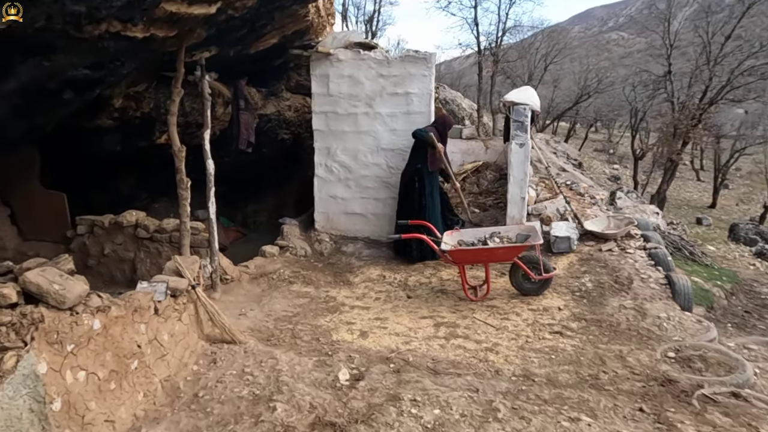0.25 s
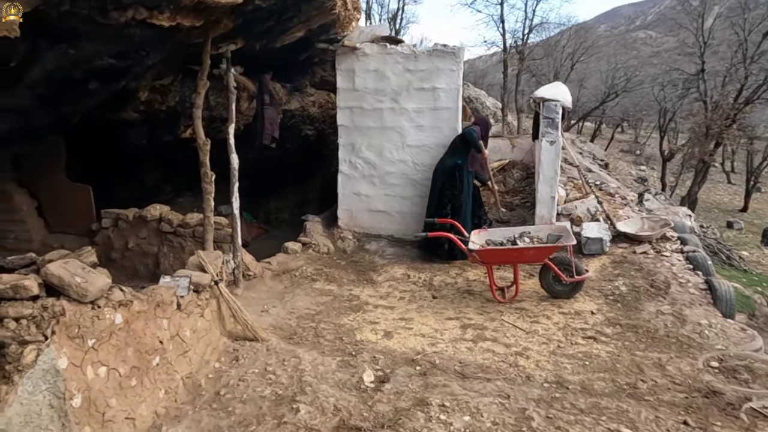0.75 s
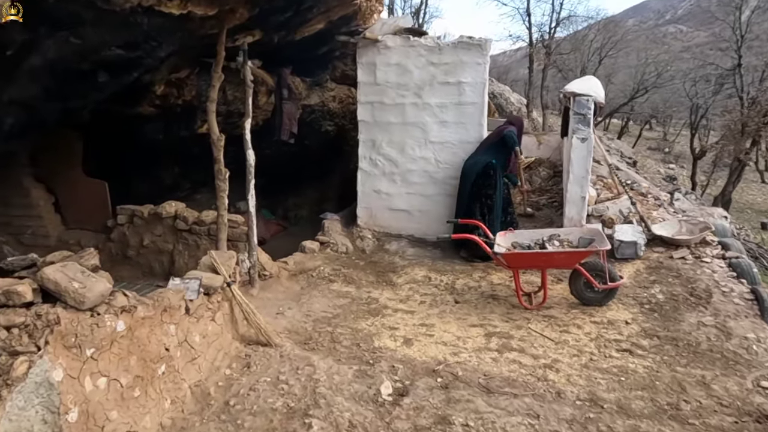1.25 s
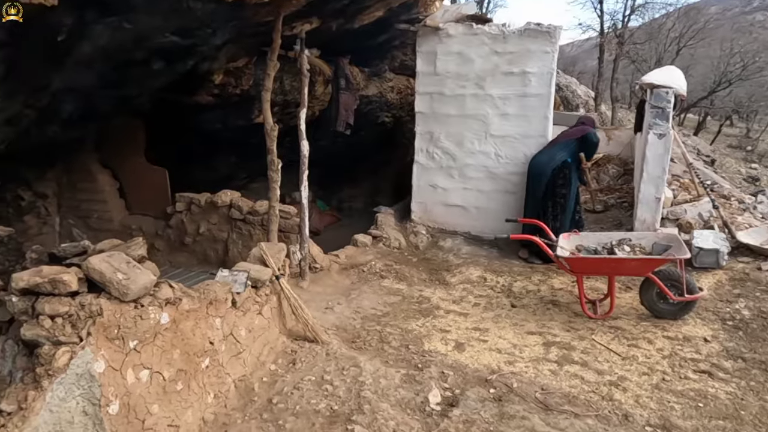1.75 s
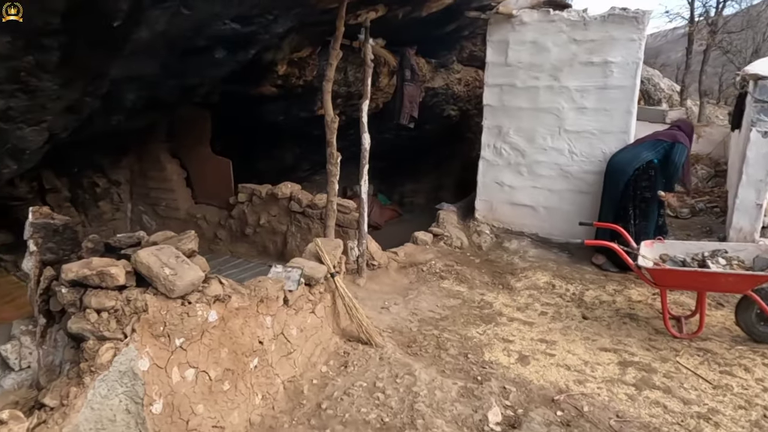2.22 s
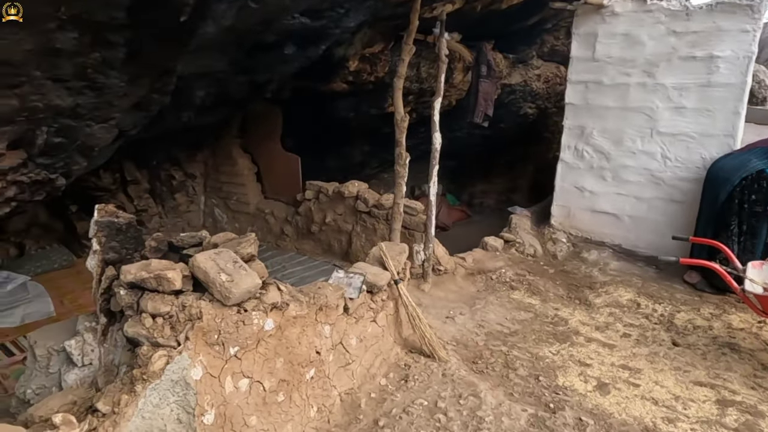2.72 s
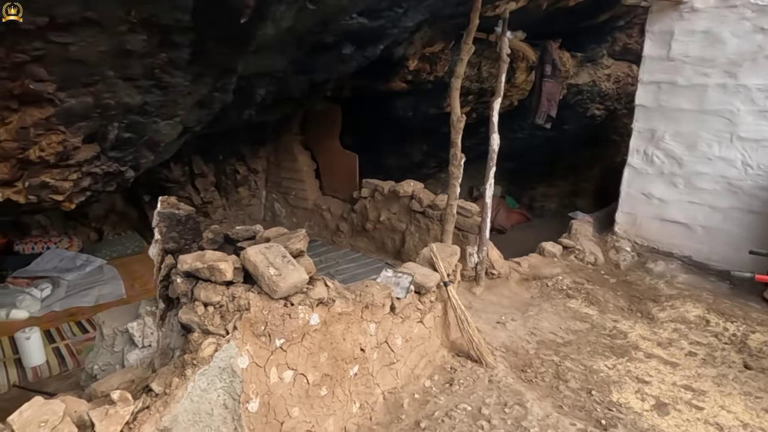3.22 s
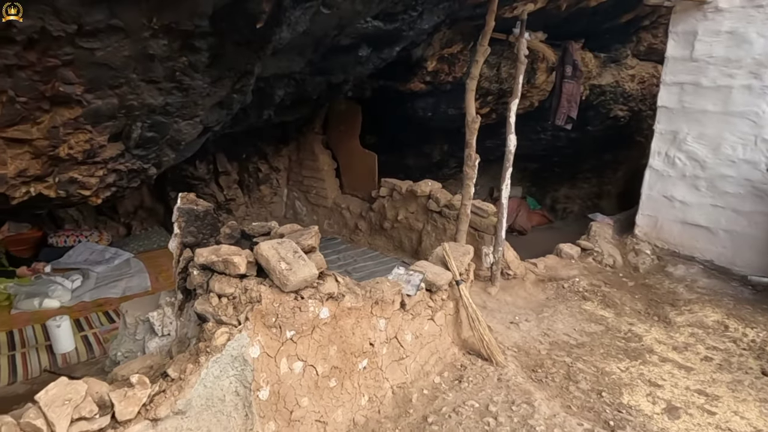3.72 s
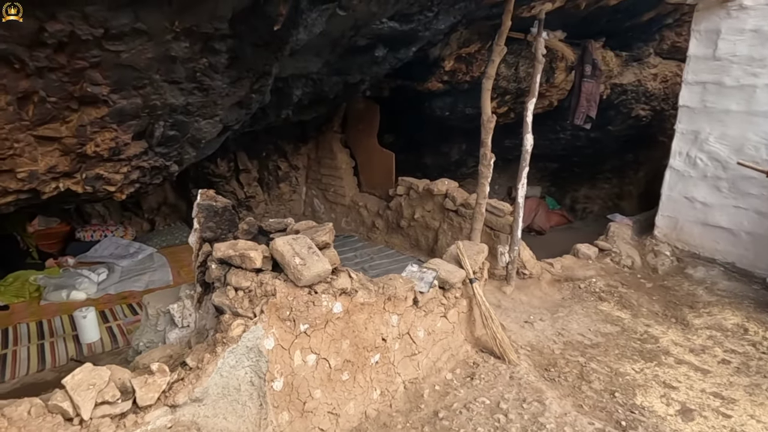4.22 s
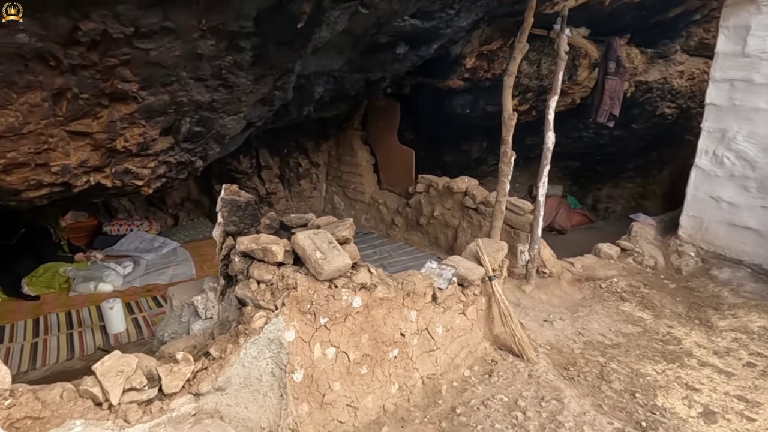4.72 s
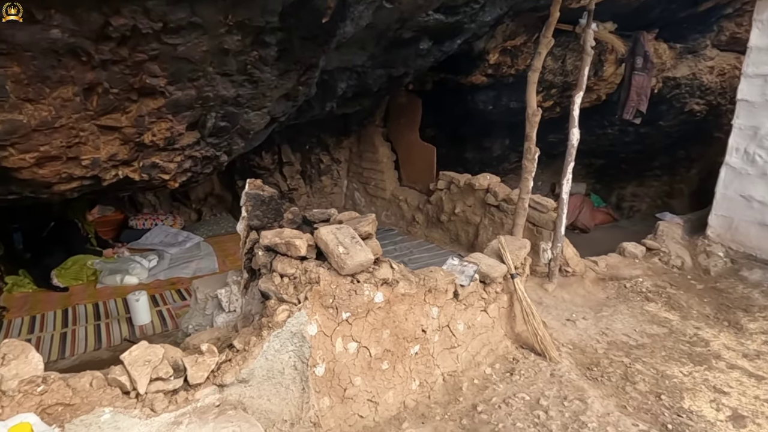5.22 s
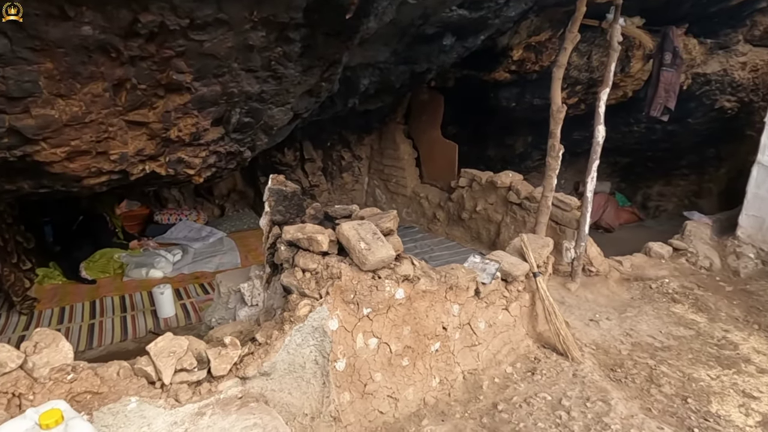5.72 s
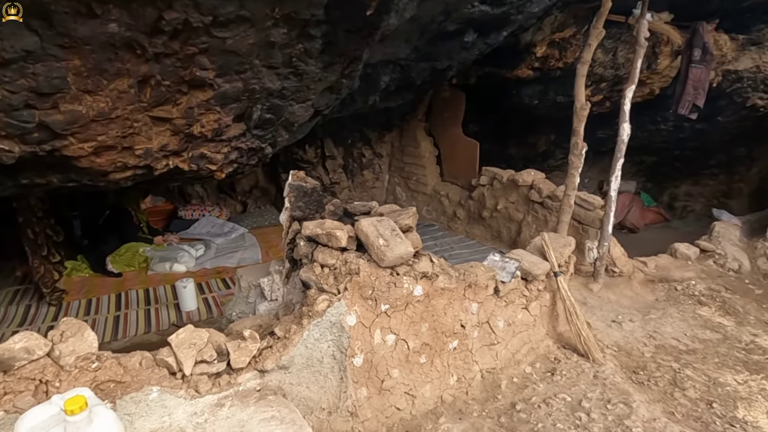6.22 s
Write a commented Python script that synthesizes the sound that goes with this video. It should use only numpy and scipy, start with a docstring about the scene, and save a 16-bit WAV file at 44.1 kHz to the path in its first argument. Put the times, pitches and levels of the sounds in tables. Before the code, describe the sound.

A shovel scrapes gritty dirt and knocks stones in bursts, then rubble thuds and clangs into a steel wheelbarrow outdoors, with low breeze and camera bumps.

```python
"""Beside a rock shelter, a long-handled shovel scrapes up dirt and stones and tips a load into a steel wheelbarrow.
Grit grinding is random tiny collisions, shaped in tone and following the force of each push.
Stones, clods and the tray are short bursts of collisions that ring or thud; a wall and the rock echo them.
Noise makes the breeze and hiss, single pressure pushes bump the camera, and gliding tones make a small far bird."""
import sys
import numpy as np
from scipy import signal
from scipy.fft import rfft, irfft
from scipy.io import wavfile
from scipy.ndimage import uniform_filter1d, map_coordinates

SR = 44100
rng = np.random.default_rng(int(sys.argv[2]) if len(sys.argv) > 2 else 0)


def dump(signal):
    """Clip the signal to [-1, 1] and save it as 16-bit WAV at the path in sys.argv[1]."""
    limited = np.clip(np.atleast_2d(signal).T, -1, 1)
    pcm = np.round(limited * 32767).astype(np.int16)
    wavfile.write(sys.argv[1], SR, pcm)


N = 284886
TIME = np.arange(N) / SR

# In all tables, levels are relative: the functions set the balance between layers.
# tone of grit on steel: pitch_hz [Hz], level_db [dB]
GRIT_TONE = [(100, -21.5), (200, -3), (420, -12.5), (640, -6), (900, -4), (1200, -0.5), (1600, -0.5),
             (2200, -9.5), (3100, -6.5), (4300, -8), (5500, -11.5), (7000, -12), (9000, -20),
             (12000, -29.5), (15500, -45)]
# rubble landing in the wheelbarrow: start_s [s], level_db [dB], settle_s [s], half_cutoff_hz [Hz, half the treble cutoff]
DUMPS = [(4.723, -41.5, 0.038, 896), (4.804, -30, 0.015, 800), (4.822, -26.5, 0.016, 780),
         (4.866, -34, 0.034, 1900), (4.9015, -21.5, 0.01, 3410), (4.912, -22, 0.015, 2802),
         (4.935, -27, 0.01, 1400), (4.948, -26.5, 0.012, 1400), (4.96, -31.5, 0.0084, 1500),
         (5.003, -41, 0.017, 1200)]
# bumps on the camera: start_s [s], level_db [dB], push_s [s]
BUMPS = [(0.458, -23.5, 0.0026), (0.477, -22, 0.054), (0.73, -28.5, 0.015), (1.225, -20.5, 0.038),
         (1.333, -17.5, 0.047), (1.48, -20.5, 0.057), (2.665, -25, 0.027), (3.345, -37.5, 0.00582),
         (3.521, -30.5, 0.014), (4.711, -11, 0.0072), (5.127, -20, 0.019), (5.425, -31.5, 0.01246),
         (6.23, -22, 0.011)]


def amp(db):
    """Turns decibels into a gain."""
    return 10 ** (np.asarray(db) / 20)


def evened(x):
    """Scales a sound to an average strength (rms) of 1."""
    return x / np.sqrt(np.mean(x ** 2) + 1e-20)


def read(points, hz):
    """Reads a table of values against pitch, on a log-frequency axis."""
    f, value = np.transpose(points)
    return np.interp(np.log(hz + 1), np.log(f + 1), value)


def add(mix, start_s, sound):
    """Mixes a sound in at a given time."""
    part = mix[max(round(start_s * SR), 0):][:len(sound)]
    part += sound[:len(part)]


def colour(x, db_at, size=4096):
    """Filters with the tone db_at(Hz), never sounding before its input; the filter has unit energy."""
    db = db_at(abs(np.fft.fftfreq(size, 1 / SR)))
    log_gain = np.log(amp(np.maximum(db - db.max(), -100)))
    # The Hilbert transform gives the phase that makes the filter respond as early as possible.
    taps = np.fft.ifft(np.exp(np.conj(signal.hilbert(log_gain)))).real[:size // 2]
    return signal.fftconvolve(x, taps / np.linalg.norm(taps))[:len(x)]


def noise(spectrum):
    """Makes steady noise with a given tone."""
    hz = np.fft.rfftfreq(N, 1 / SR)
    shaped = rfft(rng.standard_normal(N)) * amp(read(spectrum, hz))
    return evened(irfft(shaped, N))


def wander(size):
    """Makes a slow random drift by smoothing noise twice, first over size samples."""
    once = uniform_filter1d(rng.standard_normal(N), size=size)
    return evened(uniform_filter1d(once, size=size // 2))


def grains(count, per_s, spread_db):
    """Random tiny collisions: many small, a few large."""
    size = amp(spread_db * np.minimum(rng.exponential(1, count), 4))
    sign = rng.choice([-1, 1], count)
    happens = rng.random(count) < per_s / SR
    return evened(size * sign * happens)


def ring(x, modes):
    """Rings a set of fading pure tones (Hz, dB, seconds to fade 60 dB), with unit energy in all."""
    t = TIME[:SR // 2]
    tone = np.zeros(len(t))
    for k, (hz, db, t60_s) in enumerate(modes):
        tone += (-1) ** k * amp(db - 60 * t / t60_s) * np.sin(2 * np.pi * hz * t)
    return signal.fftconvolve(x, tone / np.linalg.norm(tone))[:len(x)]


def air():
    """Faint outdoor hiss, plus one broad hollow resonance that drifts with a soft low wash."""
    # tone of the hiss: pitch_hz [Hz], level_db [dB]
    hiss_tone = [(88, -23), (150, -2), (193, -7), (428, -13), (860, -20.5), (1090, -2.5), (1320, -4),
                 (1540, -11.5), (2360, -22.5), (4140, -29), (5230, -24.5), (7560, -27.5), (9730, -41),
                 (11600, -34), (15500, -63)]
    # the hollow resonance: start_s [s], level_db [dB], centre_hz [Hz]
    hollow_path = [(0, -54, 1264), (0.449, -53, 1326), (0.799, -52, 1439), (1.401, -52, 1443),
                   (2.1, -66.5, 1266), (3.001, -71, 1201), (3.6, -66, 1223), (4.298, -59, 1260),
                   (5.399, -66.5, 1283), (5.8, -62.5, 1319), (6.46, -61, 1310)]
    start_s, level_db, centre_hz = np.transpose(hollow_path)
    turn = np.exp(2j * np.pi * np.cumsum(np.interp(TIME, start_s, centre_hz)) / SR)
    raw = rng.standard_normal(N) + 1j * rng.standard_normal(N)
    band = signal.lfilter(*signal.butter(2, 150, fs=SR), raw)
    resonance = evened((band * turn).real)  # the turning carries the narrow band up to its drifting centre
    wash = noise([(90, -23), (190, 7.5), (380, -12.0), (700, -1.5), (1100, -4.5),
                  (1700, -1.5), (2600, -31.0), (8000, -57.0)])
    hollow = amp(np.interp(TIME, start_s, level_db)) * (resonance + amp(-6.0) * wash)
    hiss = noise(hiss_tone) + amp(-3) * np.array([noise(hiss_tone), noise(hiss_tone)])
    return amp(-0.5) * hollow + amp(-63) * hiss


def breeze():
    """Low wind buffeting, mostly shared by the two microphone ports; it flares up after each camera jolt."""
    # strength of the breeze: start_s [s], level_db [dB]
    gust_levels = [(0.0, -47.5), (0.7, -43), (0.9, -47), (1.3, -42), (1.6, -49.5), (2.1, -45.5),
                   (2.7, -47.5), (3.4, -47), (4.05, -50), (4.7, -42), (5.5, -57), (5.95, -49.5),
                   (6.24, -42.5), (6.46, -49)]
    # tone of the buffeting: pitch_hz [Hz], level_db [dB]
    rumble_tone = [(7.1, -24.5), (12, 4), (24, -6.5), (38, -14.5), (71, -16.5), (91, -29.5), (178, -31),
                   (254, -46), (400, -48.5), (520, -62), (880, -120)]
    gusts = amp(5.0 + np.interp(TIME, *np.transpose(gust_levels)))
    t = TIME[:SR // 3]
    fade_s, rise_s = 0.022, 0.0021
    shudder = np.exp(-t / fade_s) * (1 - np.exp(-t / rise_s))
    for start_s, level_db, push_s in BUMPS:
        quickness = 0.013 / push_s  # quicker jolts shake harder
        add(gusts, start_s, amp(level_db - 10.5) * quickness * shudder)
    own = np.array([noise(rumble_tone), noise(rumble_tone)])
    return gusts * (noise(rumble_tone) + amp(-8) * own)


def blade(x):
    """Rings the steel blade briefly, because soil damps it."""
    # ring of the blade: pitch_hz [Hz], width_hz [Hz, it fades 60 dB in 1.43 / width_hz seconds], level_db [dB]
    blade_modes = [(1130, 31, 9), (1555, 11, -3), (1993, 32, 8.5), (2512, 13, 0), (2785, 39, 0.5),
                   (2982, 24, 5), (3660, 20, 2.5), (4020, 37, -3.5), (4630, 16, -2), (5660, 74, -18),
                   (5950, 120, -15.5), (7300, 64, -2.5)]
    return ring(x, [(hz, db, 1.43 / width_hz) for hz, width_hz, db in blade_modes])


def detuned(x):
    """Soil sliding over the blade keeps bending its ring, by up to 2.5 percent in pitch."""
    knots = np.arange(0, N / SR + 1, .15)
    bend = np.interp(TIME, knots, rng.uniform(-.025, .025, len(knots)))
    return map_coordinates(x, [np.arange(N) + np.cumsum(bend)], order=3, mode="mirror")


def pebbles(per_s, cycles, spread_db, count=36):
    """Many small stones, each ringing at its own pitch, chatter in short clumps."""
    out, t = np.zeros(N), TIME[:SR // 30]
    for hz in np.geomspace(900, 9000, count) * rng.uniform(.95, 1.05, count):
        tick = evened(np.sin(2 * np.pi * hz * t) * np.exp(-t * hz / cycles))
        hits = grains(N, per_s, spread_db) * amp(3.5 * wander(1200))
        level = np.sqrt(hz) * amp(read(GRIT_TONE, hz))
        out += level * signal.oaconvolve(hits, tick)[:N]
    return evened(out)


def rasp(length_s, start_hz, end_hz, sharpness):
    """Quick slips of grit ring a resonance that glides in pitch."""
    hz = np.geomspace(start_hz, end_hz, int(length_s * SR))
    turn = np.exp(2j * np.pi * np.cumsum(hz) / SR)
    slips = grains(SR // 4, per_s=1200, spread_db=2)[:len(hz)]
    # Shift the glide down to zero pitch, keep a narrow band there, then shift it back up.
    narrow = signal.lfilter(*signal.butter(2, start_hz / max(sharpness, 2), fs=SR), slips / turn)
    return evened((turn * narrow).real) * signal.windows.tukey(len(hz), .7)


def scratches(count=260):
    """Pebbles catch under the blade and skid, each starting at its own pitch and falling a little."""
    out = np.zeros(N)
    for k, (when, pitch, span, force) in enumerate(rng.random((count, 4))):
        hz = 1100 * 4.5 ** pitch
        start_s = (k + when) / count * N / SR
        skid = rasp(.028 * (.5 + span), hz, hz * .88, sharpness=14)
        add(out, start_s, amp(6 * force) * skid)
    return evened(out)


def effort(start_s, rise_s, hold_s, fade_s):
    """Force of one movement: it builds, holds, then fades 20 dB per fade_s (negative fade_s makes it swell)."""
    age = TIME - start_s
    build = np.clip(age / max(rise_s, .001), 0, 1) ** 1.92
    return build * amp(-20 * np.maximum(age - rise_s - hold_s, 0) / fade_s)


def scrape():
    """Grit catches and slips along the blade and pebbles chatter on it; a heavier load adds low grinding."""
    # pushes of the shovel: start_s [s], rise_s [s], hold_s [s], fade_s [s per 20 dB],
    # level_db [dB], weight_db [dB of extra low grinding]
    strokes = [ (0.281, 0.043, 0.0085, 0.2, -45.5, -2), (0.463, 0.054, 0.02, 0.0525, -39, -3.5),
               (0.539, 0.059, 0.047, 0.06, -50.5, 2.5), (0.924, 0.12, 0.0197, 0.44, -48.5, -1),
               (1.074, 0.0388, 0.0048, 0.1341, -38, -6), (1.198, 0.053, 0.27, 0.1, -55, -5),
               (1.566, 0.1502, 0.054, 0.1262, -34, -11), (2.275, 0.11, 0.028, 0.122, -45.5, -3),
               (2.514, 0.1024, 0.093, 0.47, -55.5, -11), (2.664, 0.058, 0.044, 0.1118, -38.5, -2),
               (4.434, 0.11, 0.015, 0.4552, -43, -4), (4.554, 0.12, 0.4, 0.21, -43.5, -3.5),
               (5.942, 0.1, 0.02, 0.1, -39.5, -9), (6.042, 0.098, 0.35, 0.2, -41.5, -10),
               (6.168, 0.14, 0.14, -1.5, -38.5, -12)]
    # loose dirt trickling: start_s [s], length_s [s], level_db [dB]
    trickle_times = [(0.0, 0.013, -58.5), (0.13, 0.025, -54.5), (0.772, .24, -71), (1.896, 0.262, -60),
                     (2.246, 0.14, -66), (2.942, 0.21, -62), (5.15, 0.099, -58.5), (5.533, 0.059, -63)]
    drive = grains(N, per_s=4500, spread_db=3.6) * amp(2 * wander(300))
    grit = colour(drive, lambda hz: read(GRIT_TONE, hz))
    grit += amp(-11.5) * detuned(blade(drive))
    grit += amp(-2) * pebbles(per_s=45, cycles=6, spread_db=3)
    grit += amp(-5.5) * scratches()
    low = evened(signal.sosfilt(signal.butter(3, 1300, "low", fs=SR, output="sos"), grit))
    high = evened(signal.sosfilt(signal.butter(3, 1300, "high", fs=SR, output="sos"), grit))

    trickles = [(s, 0.0071, length_s, 0.12, db, 1) for s, length_s, db in trickle_times]
    # Grit follows each shower of rubble into the wheelbarrow.
    spills = [(s, 0.0066, 0, 0.035, db - 16, 7.5) for s, db, _, _ in DUMPS]
    force, load = np.zeros((2, N))
    for start_s, rise_s, hold_s, fade_s, level_db, weight_db in [*strokes, *trickles, *spills]:
        push = amp(level_db) * effort(start_s, rise_s, hold_s, fade_s)
        force = np.hypot(force, push)
        load = np.hypot(load, amp(weight_db) * push)
    return amp(-4) * force * high + amp(-3) * load * low


def stones():
    """Each stone gives a hard tick and a short crumble, rings at its own pitch, and rings the blade a little."""
    # stones knocking: start_s [s], level_db [dB at its loudest], pitch_hz [Hz], treble_db [dB],
    # crumble_s [s], tick_db [dB, first tick against the crumble]
    knocks = [ (0.141, -30.5, 3900, -4, 0.0041, 15), (0.152, -31, 6800, 1, 0.016, 9),
              (0.33, -39.5, 3700, 8, 0.012, -9), (0.5212, -32.5, 4700, 13, 0.0075, 8),
              (0.612, -38, 3700, 12, 0.029, 1), (.638, -39, 7800, 6.5, 0.0056, 4),
              (.812, -55, 5040, 10, 0.0045, 8.5), (1.017, -42, 6080, 11, 0.0059, -3),
              (1.047, -31, 2670, -13, 0.0093, -15), (1.1098, -32.5, 3200, -3, 0.0064, 1),
              (1.116, -33, 7100, -4, 0.0049, -4), (1.1247, -26, 2800, -26, 0.0061, 7),
              (1.166, -39, 4200, -3, .004, 8), (1.188, -31, 2400, -16, 0.0083, 4.5),
              (1.272, -40, 4040, -11, 0.013, 6), (1.319, -37, 3110, -5, 0.012, 5.5),
              (1.341, -43, 5100, -6, 0.0061, 5.5), (1.407, -42.5, 3700, -21, 0.0091, -4),
              (1.431, -40.5, 3200, -24, 0.0082, 4), (1.49, -47, 4600, -9, .004, 6),
              (1.519, -34, 2950, -3.5, 0.013, 6), (1.656, -32.5, 3140, -1.5, 0.0186, 3),
              (1.699, -29, 3220, -8, 0.0088, -1), (1.730, -19.5, 2140, -2, 0.0065, 7),
              (1.7351, -25, 2340, -9, 0.00705, -5), (1.776, -25, 3140, -1, 0.0054, 4.5),
              (1.843, -25, 1490, -12, 0.0046, 4), (1.8689, -32.5, 1460, -18, 0.0042, 14),
              (1.884, -29, 1362, -5, 0.0049, -1), (1.979, -30, 4700, 0, 0.011, 9.5),
              (2.088, -49, 7300, 8, 0.01, 7), (2.355, -42, 7000, 6, .012, 3),
              (2.419, -34, 1520, 3, 0.013, 8), (2.702, -33, 1140, 5, 0.019, 10),
              (2.737, -22.5, 1570, 4, 0.0077, 4), (2.745, -22, 1140, -5, .005, 10),
              (2.749, -24, 2500, -6, .004, 7), (2.757, -22, 1690, 0, .006, 6),
              (2.77, -19, 1510, 3, 0.005, 9), (2.774, -21.5, 5240, -7, 0.0053, 4),
              (2.78, -19, 4180, 4.5, 0.0061, 13), (2.788, -24.5, 3940, 4, 0.0067, 7),
              (2.809, -37, 1560, -6, 0.011, 2), (2.951, -54, 6000, 5, 0.0078, 3),
              (2.98, -51, 4440, 12, 0.0065, 5), (3.035, -53, 5000, 8, .005, 4),
              (3.109, -50, 2800, 1, 0.0084, 5), (3.127, -47.5, 2000, 4, 0.014, 6),
              (4.553, -33.5, 3600, -13, .02, -4.5), (4.562, -33, 1500, -9, .008, 4),
              (4.627, -37, 1700, -10, .006, 5), (4.687, -37.5, 2600, -7, 0.0056, 5),
              (4.788, -36, 3600, -4.5, 0.0045, 4.5), (4.864, -21, 3200, 7, 0.014, 4),
              (4.869, -23, 5300, 3, 0.011, -3), (4.901, -21.5, 2718, -12, .012, -4),
              (4.912, -19.5, 2900, -10, 0.0084, 6), (4.925, -25, 2050, -10, 0.012, 3.5),
              (4.959, -27.5, 1750, -12, 0.0047, 6), (5.0595, -23, 2000, -16, 0.002, 15),
              (5.065, -23.5, 3970, 6, 0.0076, 0), (5.0675, -20, 8700, 10, 0.0037, 13.5),
              (5.163, -40.5, 5980, -14, 0.0063, 10.5), (5.54, -53.5, 3380, 11, 0.0083, 5.5),
              (5.782, -54, 4500, 10, 0.007, 8), (6.042, -27.5, 5200, -4, 0.015, -16),
              (6.079, -33, 3200, -11, 0.0039, 7), (6.104, -33, 3280, -10, 0.0039, 3),
              (6.1332, -20, 3200, -7, 0.012, 7.5), (6.166, -34.5, 2960, -21, 0.025, -2),
              (6.2109, -32, 1570, -2, 0.023, 1), (6.244, -32, 2700, -6, 0.0088, 2.5),
              (6.287, -29.5, 2420, -12.5, 0.0089, 1), (6.316, -28, 3100, -13, 0.0096, 6),
              (6.366, -29.5, 2600, -20.5, 0.0095, 3), (6.426, -29, 2470, -20, 0.013, 3)]
    # general tone of a knock: pitch_hz [Hz], level_db [dB]
    stone_tone = [(150, -27), (500, -16), (1200, 2.5), (3500, 1.5), (7000, -3.5), (10000, -14),
                  (13000, -29), (15500, -35)]
    # ring of a stone: ratio [times its pitch], peak_db [dB]
    partials = [(1, 4.9), (1.42, 1.8)]
    out, t = np.zeros(N), TIME[:SR // 6]
    for start_s, level_db, pitch_hz, treble_db, crumble_s, tick_db in knocks:
        contact = grains(len(t), per_s=3500, spread_db=1.5) * np.exp(-t / crumble_s)
        contact += amp(tick_db) * rng.choice([-1, 1], len(t)) * np.exp(-t / 0.000756)

        def tone(hz):
            """A broad hump and narrow peaks set by the stone's pitch, with its own treble."""
            body = 6 * np.exp(-(np.log2((hz + 1) / pitch_hz) / .5) ** 2)
            peaks = sum(peak_db / (1 + (17.3 * (hz / (ratio * pitch_hz) - 1)) ** 2)
                        for ratio, peak_db in partials)
            treble = treble_db * hz ** 4 / (hz ** 4 + 5500 ** 4)
            return read(stone_tone, hz) + body + peaks + treble

        knock = colour(contact, tone)
        loudest = np.sqrt(uniform_filter1d(knock ** 2, size=128).max())
        add(out, start_s, amp(level_db) * knock / loudest)
    return amp(-6.5) * out + amp(-22.5) * blade(out)


def bites():
    """As soil covers more of the blade, the resonance that the grit excites slides in pitch."""
    # the blade biting deeper: start_s [s], length_s [s], start_hz [Hz], end_hz [Hz], level_db [dB], sharpness
    bite_glides = [(0.302, .149, 4270, 3900, -62, 17), (1.046, 0.034, 1650, 1350, -39, 12),
                   (1.184, .04, 2450, 830, -41.5, 5.6), (1.407, .045, 1750, 1510, -47, 22),
                   (1.626, .1, 2900, 3350, -44.5, 14), (1.741, 0.074, 1300, 950, -46, 10),
                   (1.837, 0.057, 1600, 1360, -44, 12), (1.876, .08, 1450, 900, -46, 9),
                   (2.001, 0.058, 1150, 735, -54, 9), (4.499, .11, 2900, 2350, -46.5, 8.6),
                   (4.535, 0.12, 1650, 1120, -42.5, 4), (6.14, 0.021, 3200, 1600, -41.5, 5),
                   (6.166, 0.033, 3150, 2280, -40.5, 8), (6.309, 0.056, 3200, 1670, -42, 6),
                   (6.357, 0.049, 1510, 855, -45, 10)]
    out = np.zeros(N)
    for start_s, length_s, start_hz, end_hz, level_db, sharpness in bite_glides:
        add(out, start_s, amp(level_db) * rasp(length_s, start_hz, end_hz, sharpness))
    return out


def clods():
    """Lumps of soil and the blade bumping the ground break into a dull crunch around one pitch."""
    # crunches: start_s [s], level_db [dB], settle_s [s], pitch_hz [Hz]
    crunches = [(0.457, -48, 0.0075, 256), (1.121, -64, 0.0144, 300), (1.214, -43, 0.009, 600),
                (2.702, -33.5, 0.021, 970), (2.742, -30.5, 0.024, 830), (3.0, -55, 0.00948, 1030),
                (3.12, -53, 0.0373, 260), (4.710, -30, 0.0019, 1000), (6.061, -41, 0.021, 1080),
                (6.145, -51.5, 0.014, 280), (6.364, -42, 0.016, 990)]
    out, t = np.zeros(N), TIME[:SR // 4]
    for start_s, level_db, settle_s, pitch_hz in crunches:
        crunch = grains(len(t), per_s=3600, spread_db=3.5) * np.exp(-t / settle_s)
        # 11 dB weaker for each octave away from the pitch
        dull = colour(crunch, lambda hz: -11 * abs(np.log2((hz + 1) / pitch_hz)))
        add(out, start_s, amp(level_db) * dull)
    return out


def bumps():
    """Each jolt of the camera is one push of pressure and a slower rebound."""
    out, t = np.zeros(N), TIME[:SR // 2]
    for start_s, level_db, push_s in BUMPS:
        u = t / push_s
        swing = np.sin(np.pi * np.sqrt(u))  # the square root slows the swing down as it goes on
        push = swing * np.exp(-u / 1.97) * (1 - np.exp(-(u / 0.24) ** 2))
        add(out, start_s, amp(level_db) * push)
    return out


def bird():
    """Thin, slightly falling whistles: pure tones whose pitch trembles."""
    # bird notes: start_s [s], length_s [s], start_hz [Hz], end_hz [Hz], level_db [dB]
    chirps = [(4.236, 0.064, 6680, 6480, -68.5), (4.25, 0.069, 7060, 6930, -71.5),
              (4.332, 0.038, 6700, 6600, -70), (4.361, 0.052, 6550, 6430, -69),
              (4.421, 0.0218, 7000, 6830, -67.5), (4.452, 0.047, 6670, 6410, -73)]
    out = np.zeros(N)
    for start_s, length_s, start_hz, end_hz, level_db in chirps:
        hz = np.linspace(start_hz, end_hz, int(length_s * SR))
        hz = hz + 35 * evened(uniform_filter1d(rng.standard_normal(len(hz)), size=100))
        whistle = np.sin(2 * np.pi * np.cumsum(hz) / SR)
        add(out, start_s, amp(level_db) * whistle * signal.windows.tukey(len(hz), .5))
    return out


def wheelbarrow():
    """Each shower of rubble drums on another part of the steel tray and stirs its modes differently."""
    # ring of the loaded tray: pitch_hz [Hz], level_db [dB], t60_s [s to fade 60 dB]
    tray_modes = [(172.5, -9, 0.24), (221, -6.5, 0.13), (445, -3.5, 0.23), (487.4, -5.5, 0.36),
                  (648, -5, 0.23), (680, -9.5, 0.16), (728, -4, 0.18), (821, -5.5, 0.13),
                  (1000, -3.5, 0.19), (1043, -7, 0.152), (1145, -1, 0.181), (1254, -5, 0.2),
                  (1340, -6, 0.12), (1441, -9, 0.24), (1730, -8, 0.15), (2100, -17, 0.13),
                  (2750, -16.5, .12), (3240, -10, .1)]
    # tone of the thud: pitch_hz [Hz], level_db [dB]
    thud_tone = [(59, -62), (100, -34.5), (172, -4), (214, -11.5), (320, -10.5), (449, -3), (527, -8),
                 (640, -7.5), (790, -7), (1000, -2.5), (1400, -5.5), (2200, -15), (3140, -11.5),
                 (6850, -29.5), (12000, -45), (15600, -72.5), (22000, -120)]
    out, t = np.zeros(N), TIME[:SR // 2]
    for start_s, level_db, settle_s, half_cutoff_hz in DUMPS:
        shower = grains(len(t), per_s=5000, spread_db=1.2) * np.exp(-t / settle_s)
        drive = signal.lfilter(*signal.butter(1, min(2 * half_cutoff_hz, SR / 3), fs=SR), shower)
        modes = [(hz, db + 1.5 * rng.standard_normal(), t60_s) for hz, db, t60_s in tray_modes]
        thud = amp(2.5) * colour(drive, lambda hz: read(thud_tone, hz))
        add(out, start_s, amp(level_db) * (thud + amp(-4.5) * ring(drive, modes)))
    return out


def booms():
    """The weight of the load flexes the tray's floor with a low fading boom."""
    # booms: start_s [s], level_db [dB], settle_s [s]
    boom_times = [(4.735, -36, .035), (4.815, -25, 0.027), (4.901, -21.5, 0.039)]
    boom_hz, rise_s = 173, 0.0063
    out, t = np.zeros(N), TIME[:SR // 2]
    for start_s, level_db, settle_s in boom_times:
        swell = np.exp(-t / settle_s) * (1 - np.exp(-t / rise_s))
        add(out, start_s, amp(level_db) * np.sin(2 * np.pi * boom_hz * t) * swell)
    return out


def shelter(x, wall_db, tail_db):
    """Adds a quick echo from the wall, scatter from the ground and a tail from the rock."""
    # fading of the echoes: pitch_hz [Hz], t60_s [s to fade 60 dB, before the shaping below]
    echo_fade = [(150, 1), (1000, 0.39), (3500, 0.22), (7000, 0.26), (14000, 0.178)]
    # difference between the ports' echoes: pitch_hz [Hz], separate part [times the shared part]
    port_difference = [(200, .15), (600, .35), (1200, .7), (2200, 1.6), (12000, 2)]
    hz, t, z = signal.stft(rng.standard_normal((3, SR * 2 // 3)), SR, nperseg=256)
    apart = read(port_difference, hz)[:, None]
    z = (z[0] + apart * z[1:]) / np.hypot(1, apart)
    fade = amp(-60 * t / read(echo_fade, hz)[:, None])
    tails = signal.istft(z * fade, SR, nperseg=256)[1]
    age = TIME[:tails.shape[1]]
    scatter = tails * np.exp(-age / .006) * (age > .0004)
    tails = tails * (1 + 3 * np.exp(-age / 0.02)) * (age > .008)  # stronger at first
    echoes = amp(tail_db) * tails / np.linalg.norm(tails[0])
    echoes = echoes + amp(-4.5) * scatter / np.linalg.norm(scatter[0])
    # The wall's echo reaches the two ports at slightly different times.
    wall = np.array([np.pad(x, (round(delay_s * SR), 0))[:N] for delay_s in (.0099, .01002)])
    return x + amp(wall_db) * wall + signal.fftconvolve(x[None], echoes, axes=1)[:, :N]


def scene():
    """Puts the digging in its surroundings, over the air and the camera's own low noises."""
    digging = shelter(scrape() + bites() + clods(), wall_db=-17.0, tail_db=-12.5)
    knocking = shelter(stones(), wall_db=-16.5, tail_db=-12.0)
    far_bird = shelter(bird(), wall_db=-15, tail_db=-6.5)
    tipping = shelter(wheelbarrow(), wall_db=-36.5, tail_db=-16.0) + booms()
    return digging + knocking + far_bird + tipping + air() + breeze() + bumps()


def record(dry):
    """The two microphone ports colour and delay the sound differently; then the highest treble is cut."""
    # timing of the ports: pitch_hz [Hz], lead of the left port [radians]
    port_lead = [(100, 0), (700, -.15), (1300, -.7), (1850, -1.15), (2500, -.15), (3450, -1.15),
                 (4300, -.1), (5450, -.45), (6400, 0), (11000, -.2)]
    # balance of the ports: pitch_hz [Hz], left minus right [dB]
    port_balance = [(60, -2), (110, 0), (200, -1.5), (380, -3), (700, -1), (1290, 0.0), (2380, -1),
                    (4400, -1), (8120, 1), (15000, 7)]
    edge_hz = 15650
    hz = np.fft.rfftfreq(N, 1 / SR)
    # Each port takes half of the difference, in opposite directions.
    half = amp(read(port_balance, hz) / 2) * np.exp(.5j * read(port_lead, hz))
    ported = irfft(rfft(dry) * np.array([half, 1 / half]), N)
    treble_cut = signal.firwin(511, edge_hz, window=("kaiser", 9), fs=SR)
    return signal.oaconvolve(ported, treble_cut[None], "same")


dry = scene()
out = record(dry)
dump(out)
```